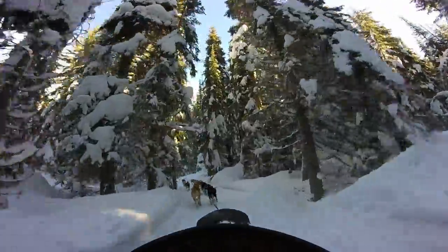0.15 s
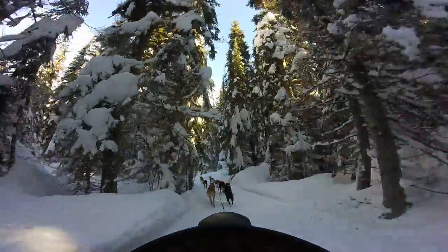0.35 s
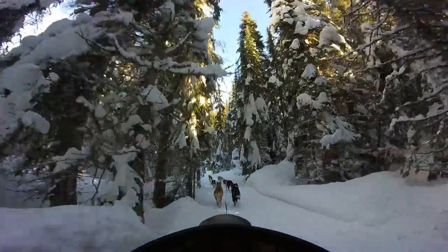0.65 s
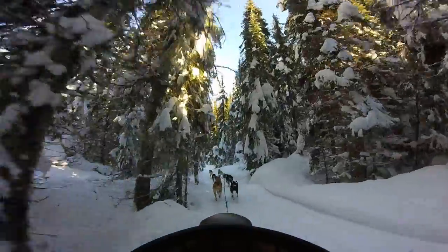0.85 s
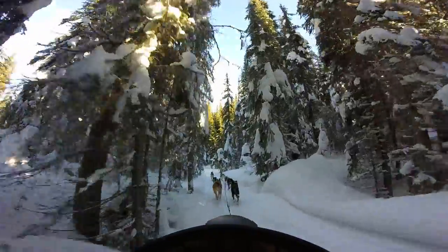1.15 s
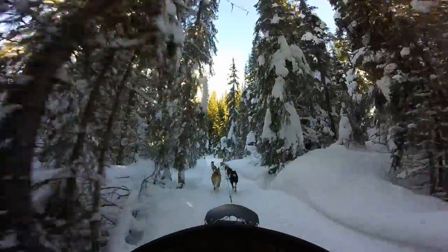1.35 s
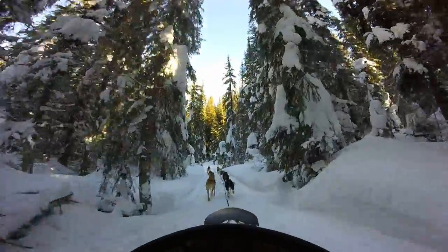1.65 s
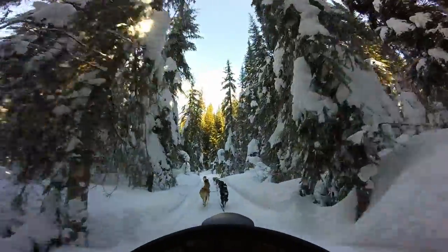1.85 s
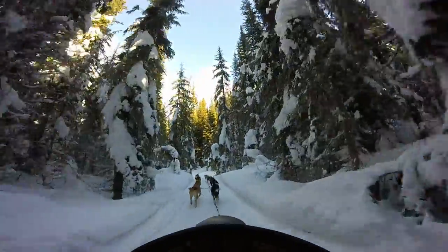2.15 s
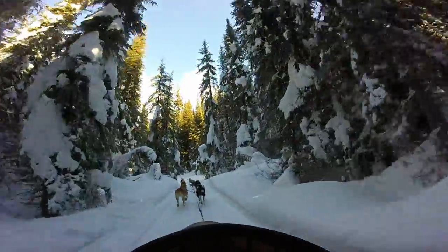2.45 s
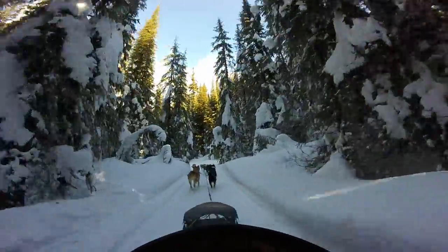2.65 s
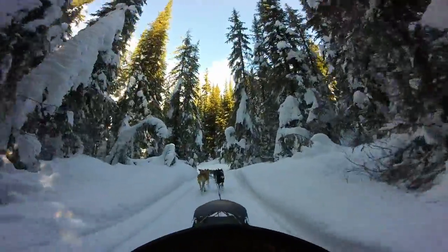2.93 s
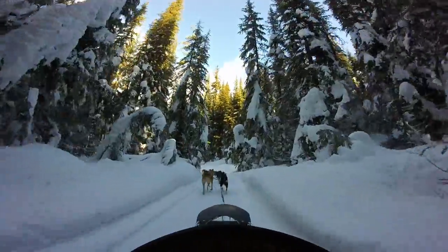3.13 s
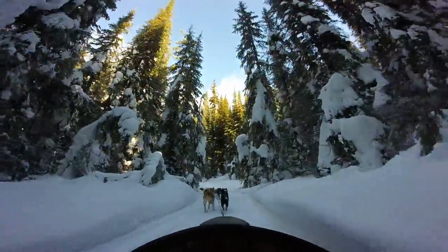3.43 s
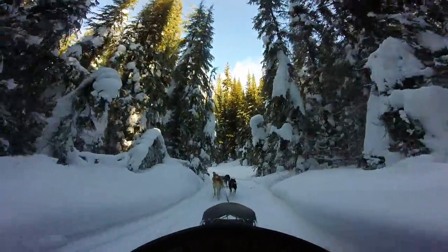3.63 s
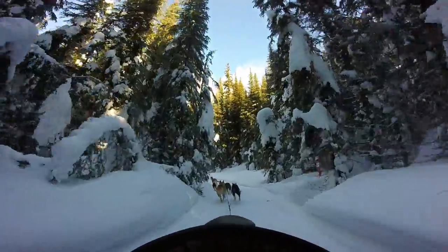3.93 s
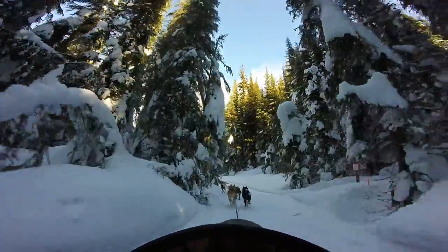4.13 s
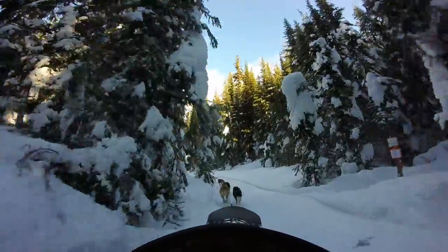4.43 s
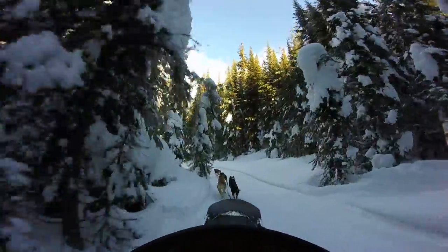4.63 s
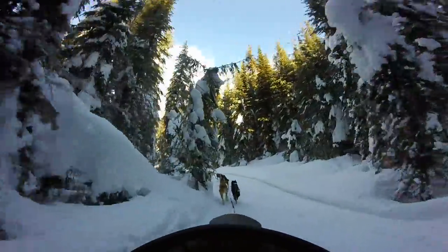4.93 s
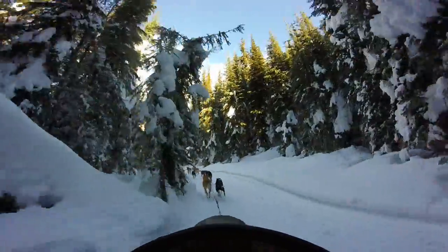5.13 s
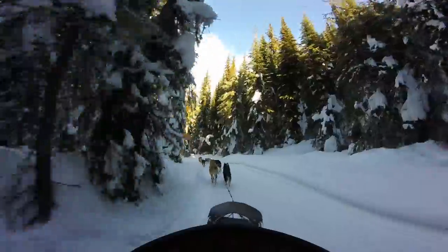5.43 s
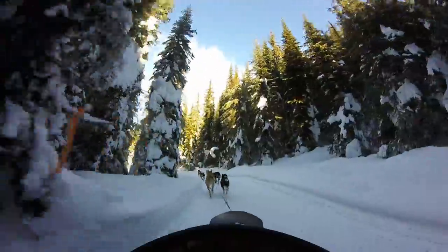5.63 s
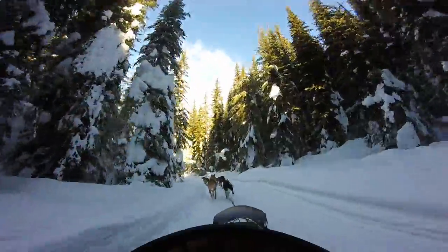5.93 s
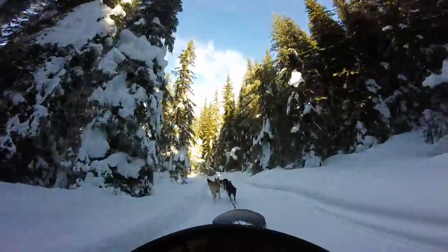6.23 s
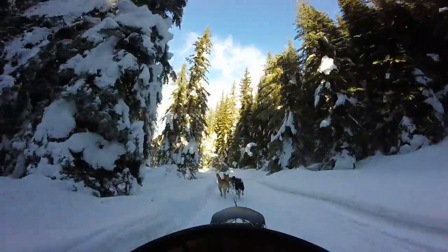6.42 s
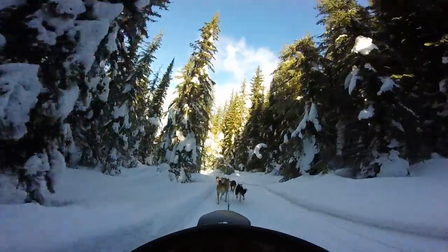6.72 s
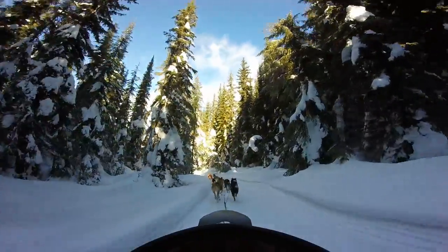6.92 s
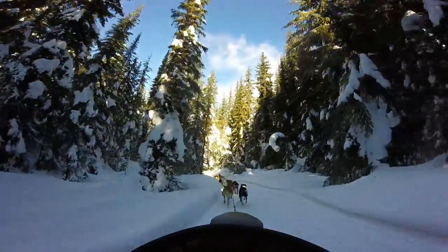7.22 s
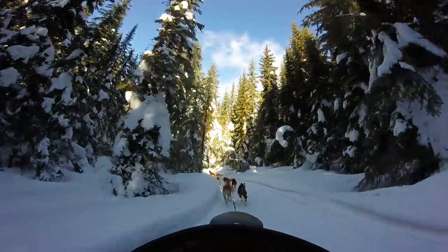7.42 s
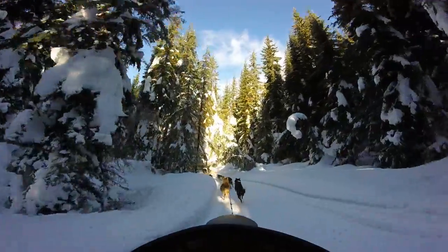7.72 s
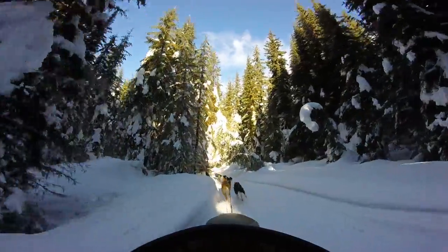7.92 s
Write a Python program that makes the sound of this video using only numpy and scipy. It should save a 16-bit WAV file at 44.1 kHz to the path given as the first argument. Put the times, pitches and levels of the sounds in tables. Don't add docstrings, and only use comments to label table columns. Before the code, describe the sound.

Sled runners shear snow without pause, a flickering mid-toned hiss with little bright spray, over a low steady drone. Ruts shake the frame into short booms and soft fluttering runs of thuds; a hard clack lands near 2.6 seconds and a heavy jolt near five. Tiny snow ticks appear. The mono microphone rides in a closed case, so everything is hollow and close, without forest echo.

```python
import sys
import numpy as np
from scipy import signal
from scipy.fft import rfft, irfft
from scipy.io import wavfile
from scipy.ndimage import uniform_filter1d

SR = 44100
rng = np.random.default_rng(int(sys.argv[2]) if len(sys.argv) > 2 else 0)


def volts_from_db(level):
    exponent = np.asarray(level, float) / 20
    return 10 ** exponent


def file_out(sig):
    cols = np.atleast_2d(sig).T
    lim = np.clip(cols, -1, 1)
    pcm = np.round(lim * 32767).astype(np.int16)
    wavfile.write(sys.argv[1], SR, pcm)


N = 355887
SMOOTH_DB = -63.5

# frequency in Hz, width in Hz, level in dB.
LOWER_MODES = [(960, 69, -18), (1298, 278, -7.5), (1448, 230, -0.5), (1589, 184, 0), (1844, 320, -12.5)]


def evened(x):
    return x / np.sqrt(np.mean(x ** 2) + 1e-20)


def add(mix, s, sound):
    part = mix[max(round(s * SR), 0):][:len(sound)]
    part += sound[:len(part)]


def ring(x, modes):
    hz = np.abs(np.fft.fftfreq(16384, 1 / SR))
    power = sum(volts_from_db(2 * db) / (1 + (2 * (hz - f) / width) ** 2) ** 2 for f, width, db in modes)
    log_gain = 0.5 * np.log(power + 1e-12)
    taps = np.fft.ifft(np.exp(np.conj(signal.hilbert(log_gain)))).real[:6000]
    return signal.oaconvolve(x, taps)[:len(x)]


def shaped(points):
    f, level_db = np.transpose(points)
    hz = np.fft.rfftfreq(N, 1 / SR)
    gain = volts_from_db(np.interp(np.log(hz + 1), np.log(f + 1), level_db))
    return evened(irfft(rfft(rng.standard_normal(N)) * gain, N))


def drift(seconds):
    size = int(seconds * SR)
    return evened(uniform_filter1d(uniform_filter1d(rng.standard_normal(N), size), size))


def humps(rows, rise, fall):
    t, out = np.arange(0, N + 64, 64) / SR, -200
    for s, length, db in rows:
        before, after = np.maximum(s - t, 0), np.maximum(t - s - length, 0)
        out = np.maximum(out, db - rise * before - fall * after)
    return np.interp(np.arange(N) / SR, t, out)


def friction(per_s, spread_db, share):
    cracks = (rng.random(N) < per_s / SR) * rng.standard_normal(N)
    cracks = cracks * volts_from_db(spread_db * np.minimum(rng.exponential(1, N), 4))
    return evened(rng.standard_normal(N) + share * evened(cracks))


def runners():
    # frequency in Hz, width in Hz, level in dB.
    upper_modes = [(2125, 162, -7), (2413, 203, -3), (2594, 197, -3.5), (2850, 700, -12), (3444, 340, -16),
                   (3960, 270, -20.5), (4310, 480, -25)]
    # frequency in Hz, width in Hz, level in dB.
    spray_modes = [(5160, 1630, 0.5), (6160, 920, 3.5), (6700, 640, 1), (7340, 550, 3.5), (8230, 2500, -1),
                   (10160, 2800, -10.5), (13900, 2100, -19.5)]
    groups = (LOWER_MODES, upper_modes, spray_modes)
    scrape_db = (-50, -53.5, -66)
    press = (1.47, 1.56, 0.92)
    follow = (1.15, 1.15, 0.4)

    crust_db = 0.59 * drift(0.028) + drift(0.013)
    scrape = friction(per_s=900, spread_db=3.5, share=0.57)
    coarse = friction(per_s=2500, spread_db=1.5, share=0.8)
    out, load_db = np.zeros(N), load()
    for modes, patch, db, push, sway in zip(groups, crunch(), scrape_db, press, follow):
        own = evened(scrape + 0.9 * rng.standard_normal(N))
        level_db = db + push * load_db + sway * crust_db + 0.43 * drift(0.015)
        out = out + evened(ring(own, modes)) * volts_from_db(level_db)
        out = out + ring(coarse * patch, modes) / np.std(ring(coarse, modes))
    return out


def load():
    # time in seconds, load in dB.
    weight = [(0.0, -0.5), (.34, 1.5), (.6, -.5), (.85, 1), (1.2, 1.5), (1.7, 2), (2.15, -0.5), (2.5, 1),
              (2.8, -2), (3.4, -0.5), (3.86, -1), (4.43, -0.5), (4.85, -1), (5.1, 5), (5.38, -0.5),
              (5.98, 2), (7.4, 0.5), (7.8, 1)]
    # centre in seconds, half length in ms, change of load in dB.
    skips = [
        (1.436, 106, -5),
        (1.3, 45, -4),
        (0.789, 24, 4.5),
        (6.29, 71, -5),
        (6.58, 150, -2.5),
        (3.8, 15, -1),
        (4.8, 46, -3),
    ]
    t = np.arange(N) / SR
    out = np.interp(t, *np.transpose(weight))
    for s, ms, db in skips:
        out = out + db * np.maximum(1 - abs(t - s) * 1000 / ms, 0)
    return out


def crunch():
    # start in seconds, length in ms, lower modes in dB, upper modes in dB, spray in dB.
    patches = [(2.288, 65, -48, -44, -66), (2.385, 63, -47, -47, -70), (2.604, 83, -46, -46, -65),
               (3.282, 85, -47, -49.5, -70), (3.39, 55, -49, -45.5, -71), (4.935, 74, -41.5, -38.5, -61.5),
               (5.045, 66, -54, -45, -68), (5.105, 86, -41.5, -42.5, -62), (5.29, 69, -61, -51, -67),
               (6.344, 160, -56, -49, -74), (6.61, 49, -51, -50, -82), (6.756, 68, -42, -45.5, -64),
               (6.834, 22, -44, -49, -65), (1.6, 115, -62, -50, -71), (7.65, 250, -65, -59.5, -69),
               (.33, 220, -61, -59, -67.5), (7.95, 97, -45.5, -47, -70)]
    out = np.zeros((3, N))
    for s, ms, *levels_db in patches:
        for row, db in zip(out, levels_db):
            add(row, s, volts_from_db(db) * signal.windows.tukey(int(ms * SR / 1000), 0.6))
    return out


def squeaks():
    # start in seconds, length in seconds, frequency in Hz, width in Hz, level in dB.
    whistles = [
        (.0, 0.32, 3450, 240, -58),
        (0.407, 0.123, 3470, 220, -58),
        (.483, .04, 4400, 200, -61),
        (0.568, .03, 4360, 200, -70),
        (.55, 0.27, 3370, 200, -72),
        (6.71, .11, 8400, 50, -74),
    ]
    out, flutter = np.zeros(N), volts_from_db(3.6 * drift(0.01))
    for (s, length, hz, width, db), air in zip(whistles, rng.standard_normal((len(whistles), SR // 2))):
        start, size = int(s * SR), int(length * SR)
        edge = evened(ring(air, [(hz, width, 0)]))[-size:] * flutter[start:start + size]
        add(out, s, volts_from_db(db) * edge * signal.windows.tukey(size, 0.5))
    return out


def roughness():
    # start in seconds, length in seconds, shake in dB.
    ruts = [(.28, 0.15, -42), (.62, 0.54, -41.5), (1.58, 0.11, -49), (1.85, 0.13, -46), (2.33, 0.37, -37),
            (2.8, 0.2, -52.5), (3.38, 0.23, -46.5), (4.02, 0.25, -39), (4.42, .1, -52.5),
            (4.98, 0.034, -32.5), (5.13, 0.097, -34), (5.45, 0.054, -51), (5.6, 0.14, -43.5),
            (5.87, 0.039, -51), (6.07, 0.06, -44.5), (6.36, 0.16, -45), (6.78, .3, -41.5),
            (7.12, 0.21, -42), (7.42, 0.26, -47), (7.67, 0.38, -41)]
    return np.maximum(humps(ruts, rise=195, fall=196), SMOOTH_DB)


def boom(rough_db):
    # frequency in Hz, width in Hz, level in dB.
    frame_modes = [(80.5, 55, -2.5), (128, 21, 2.5)]
    lumps = volts_from_db(2.5 * drift(0.015))
    return evened(ring(rng.standard_normal(N) * lumps, frame_modes)) * volts_from_db(rough_db + 2.5)


def heave(rough_db):
    # frequency in Hz, level in dB.
    spectrum = [(12, -9), (22, -6), (36, -4), (55, -6), (90, -24), (200, -50), (400, -130)]
    # time in seconds, level in dB.
    pitches = [(.43, -46), (.65, -40.5), (1.19, -39), (1.98, -50), (2.36, -28), (2.45, -43), (2.54, -33),
               (2.94, -38), (2.99, -43), (3.32, -35), (3.51, -35), (4.27, -44), (4.98, -24.5), (5.24, -30),
               (5.66, -39), (5.8, -54), (6.14, -39), (6.79, -37), (7.69, -42), (7.93, -37), (8.02, -37)]
    pitch_db = humps([(s, 0, db) for s, db in pitches], rise=220, fall=230)
    rest_db = -59.5 + 0.34 * (rough_db - SMOOTH_DB)
    return shaped(spectrum) * volts_from_db(np.maximum(pitch_db, rest_db))


def bumps():
    # time in seconds, peak in dB, ring in Hz, length in ms.
    single_blows = [(.27, -37, 125, 30), (.883, -33, 96, 25), (1.604, -33, 127, 40), (1.886, -28, 103, 43),
                    (1.997, -27.5, 93.4, 10), (2.255, -31, 102, 20), (2.291, -26.5, 111, 15),
                    (2.316, -15.5, 122.3, 45), (2.386, -26.5, 132, 11), (2.534, -24, 120, 9),
                    (3.299, -25, 91, 140), (3.352, -22, 111, 11), (3.432, -19, 122, 75),
                    (4.924, -31, 108, 19), (4.968, -22, 117, 15), (4.994, -14, 110, 63),
                    (5.058, -28.5, 127, 28), (5.124, -43, 108, 22), (5.179, -23, 128, 91),
                    (5.214, -19.5, 123.7, 79), (5.257, -24.5, 117, 8), (5.316, -26, 127, 19),
                    (6.094, -35.5, 116, 16), (6.996, -26.5, 120, 35), (7.251, -20, 104, 54),
                    (7.274, -23, 104, 19), (7.676, -28.5, 102, 16)]
    blows = single_blows + washboard()
    out, t = np.zeros(N), np.arange(int(0.25 * SR)) / SR
    for (s, db, hz, ms), (turn, side) in zip(blows, rng.random((len(blows), 2))):
        swell = (1 - np.exp(-(t / 0.005) ** 2)) * np.exp(-t / (0.00023 * ms + 0.011))
        top = np.argmax(swell) / SR
        wave = np.cos(2 * np.pi * (hz * (t - top) + 0.19 * (turn - 0.5)))
        shove = 0.08 * np.exp(-((t - top - 0.003) / 0.002) ** 2)
        add(out, s - top, volts_from_db(db) * np.sign(side - 0.3) * (swell / swell.max() * wave + shove))
    return out


def washboard():
    # first blow in seconds, gap in ms, number of blows, peak in dB, ring in Hz.
    ripples = [(0.345, 32, 2, -26.5, 113), (.676, 32, 3, -25, 94), (1.018, 37, 2, -34, 104),
               (1.195, 39.6, 3, -27, 113), (2.562, 42.3, 4, -25, 113), (3.492, 39.5, 3, -23.5, 108),
               (4.003, 45, 3, -28.5, 89), (4.121, 36.4, 6, -29, 101), (5.634, 29, 2, -29, 97),
               (6.391, 26.4, 3, -31.5, 110), (6.799, 34, 5, -31.5, 104), (7.081, 47.5, 3, -27, 108),
               (7.735, 39, 2, -37, 99), (7.837, 38, 2, -29, 77.5), (7.929, 31, 3, -32, 131)]
    blows = []
    for s, gap_ms, count, db, hz in ripples:
        for k in range(round(count)):
            detune = 0.091 * rng.uniform(-1, 1)
            blows.append((s + k * gap_ms / 1000, db, hz * (1 + detune), 16))
    return blows


def knocks():
    # time in seconds, peak in dB, upper modes over lower in dB, thud under the peak in dB.
    rattles = [(0.034, -41.5, 17, -12), (1.557, -41, 16, -11), (1.7622, -35, -4, -22),
               (2.2943, -31.5, 3, -12), (2.3107, -31.5, -11, 0), (2.3203, -34, 4, -15),
               (2.4007, -32, 10, -4.5), (2.4349, -42, -8, -4), (2.637, -19, 10, -18), (2.651, -28, 1, -17),
               (2.6843, -24.5, -10, -14.5), (2.714, -41, 2, -11), (3.3056, -34, -11, -19),
               (3.3303, -38, 7, -18), (3.427, -29.5, -17, -9), (3.509, -35.5, -8, -20),
               (3.6222, -32.5, -0.5, -3), (4.4401, -33.5, -11, -13), (4.9522, -30, 10, -11),
               (4.9676, -27, 8, -8), (4.9898, -36, 5, -1.5), (5.0068, -28.5, 2, -20), (5.13, -30, -13, -15),
               (5.1533, -31.5, 1, -5.5), (5.163, -26, -7, -12), (6.0482, -33.5, -19, -20),
               (6.6175, -37, -7, -9), (6.6344, -37, -17, -21), (6.7843, -39, 3, -12),
               (7.9944, -31.5, 6, -8)]
    # frequency in Hz, width in Hz, level in dB.
    slap_modes = [(2244, 460, 4.5), (2566, 340, 7), (3430, 650, -9)]
    # frequency in Hz, width in Hz, level in dB.
    thud_modes = [(240, 67, 5), (445, 140, 1), (610, 460, -11)]
    out, t = np.zeros(N), np.arange(2400) / SR
    slap = np.exp(-t / 0.0007)
    envelope = (1 - slap) * (slap + 0.24 * np.exp(-t / 0.0047))
    for (s, db, tilt_db, thud_db), chatter in zip(rattles, rng.standard_normal((len(rattles), 2400))):
        parts_db = (-max(tilt_db, 0), min(tilt_db, 0), thud_db)
        for part_db, modes in zip(parts_db, (LOWER_MODES, slap_modes, thud_modes)):
            sound = ring(chatter * envelope, modes)
            add(out, s, volts_from_db(db + part_db) * sound / abs(sound).max())
    return out


def ticks():
    # time in seconds, peak in dB, dying time in ms.
    crumbs = [(1.342, -60, 2), (1.6706, -50.5, 1.7), (3.1747, -58, 4), (4.2094, -61, 8), (4.2837, -59, 8),
              (4.5281, -61, 8), (4.548, -57, 8), (4.782, -61, 7.7), (5.1058, -60, 8), (5.7069, -58, 5),
              (6.1125, -60, 3), (6.7764, -64, 8), (7.7458, -64, 8)]
    out, t = np.zeros(N), np.arange(5000) / SR
    shell = [(7440, 1200, 6), (9400, 1900, -4), (13000, 4600, -15)]
    for (s, db, ms), puff in zip(crumbs, rng.standard_normal((len(crumbs), 5000))):
        sound = ring(puff * t * np.exp(-t * 1000 / ms), shell)
        add(out, s, volts_from_db(db + 5) * sound / abs(sound).max())
    return out


def drone(rough_db):
    # frequency in Hz, level in dB.
    spectrum = [(15, 5.5), (60, 0), (125, 2), (185, -3), (310, -7), (365, -5), (412, 2.5), (460, -6),
                (600, -13.5), (800, -15), (1050, -17.5), (1500, -30), (4000, -30.5), (16000, -94)]
    shake_db = 0.051 * (rough_db - SMOOTH_DB - 11.5)
    return shaped(spectrum) * volts_from_db(-48.5 + 0.4 * load() + shake_db + 1.42 * drift(0.05))


def microphone_hiss():
    return volts_from_db(-82.5) * shaped([(3000, -26), (8000, -21), (12000, 2), (15000, -2)])


def scene():
    rough_db = roughness()
    snow = runners() + squeaks()
    sled = boom(rough_db) + heave(rough_db) + bumps() + knocks()
    return (snow + sled + ticks() + drone(rough_db))[None]


def top_cut(x):
    return signal.sosfilt(signal.butter(12, 15170, fs=SR, output="sos"), x)


def record(dry):
    taps = signal.firwin(511, 15260, window=("kaiser", 8), fs=SR)
    heard = signal.oaconvolve(dry + microphone_hiss(), taps[None], "same")
    return top_cut(heard)


dry = scene()
out = record(dry)
file_out(out)
```